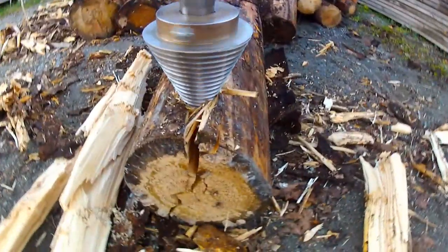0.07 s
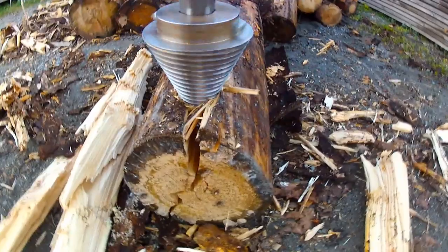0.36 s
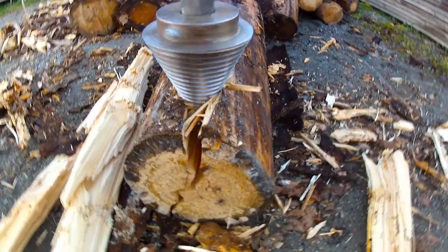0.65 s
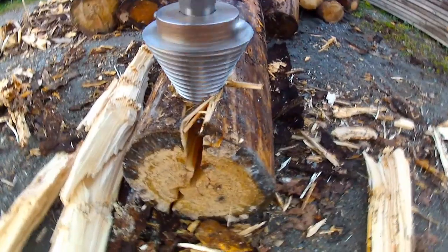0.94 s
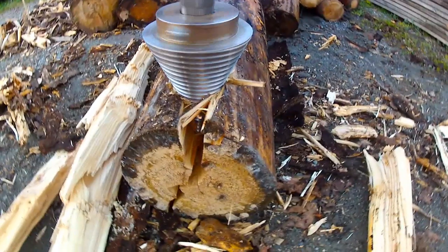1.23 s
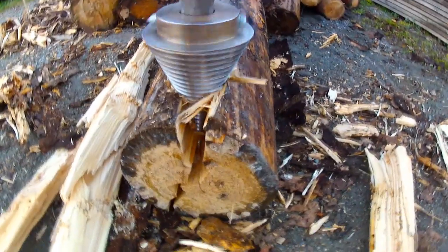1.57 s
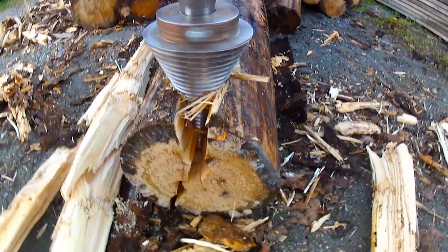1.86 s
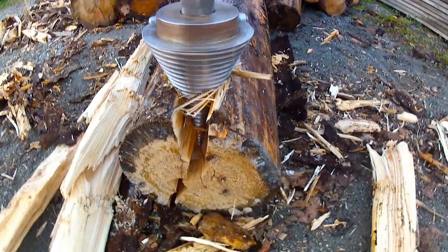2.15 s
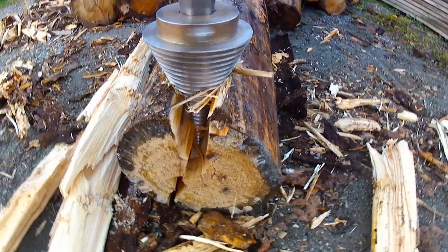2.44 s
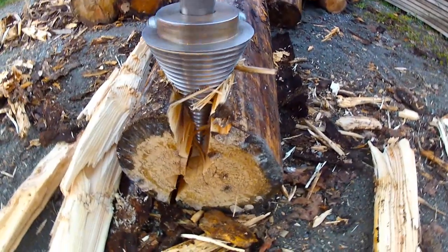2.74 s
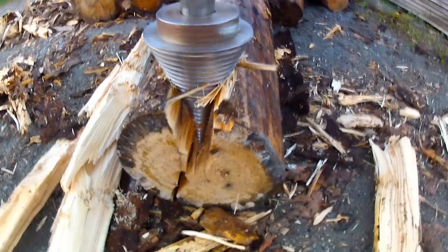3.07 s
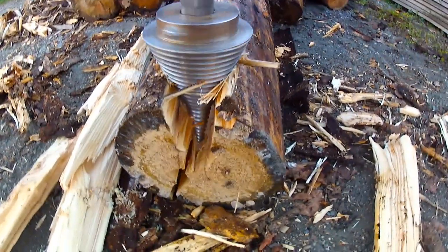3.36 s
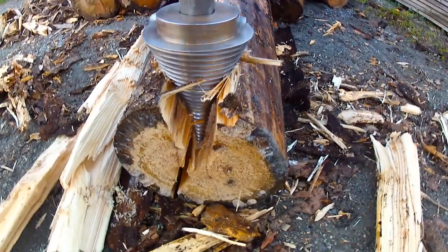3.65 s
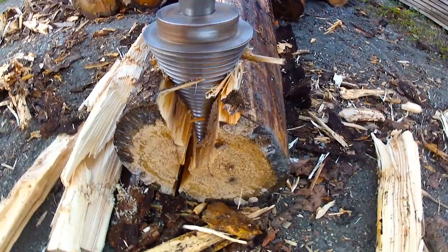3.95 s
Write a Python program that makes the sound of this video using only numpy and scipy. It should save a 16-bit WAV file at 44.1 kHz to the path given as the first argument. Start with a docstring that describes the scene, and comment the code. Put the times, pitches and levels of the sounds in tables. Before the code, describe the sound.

A log splits with sharp snaps and crackling while an engine hums steadily close by.

```python
"""Outdoors by a log pile, the camera's microphone close to a running engine.
The engine drives a cone screw that forces a log apart. Fibres crackle and splinters snap under the
strain; the big cracks also thump the log, and the ground and the pile scatter the sound back.
The camera adds a thin whine; its gain control ducks the engine after big cracks and lets it swell back."""
import sys
import numpy as np
from scipy import signal
from scipy.fft import rfft, irfft
from scipy.io import wavfile
from scipy.ndimage import uniform_filter1d, minimum_filter1d

SR = 44100
rng = np.random.default_rng(int(sys.argv[2]) if len(sys.argv) > 2 else 0)


def dump(signal):
    """Clip the signal to [-1, 1] and save it as 16-bit WAV at the path in sys.argv[1]."""
    limited = np.clip(np.atleast_2d(signal).T, -1, 1)
    pcm = np.round(limited * 32767).astype(np.int16)
    wavfile.write(sys.argv[1], SR, pcm)


N = 4 * SR


def amp(db):
    """Decibels to gain."""
    return 10 ** (np.asarray(db) / 20)


def unit(x):
    """Scales to rms 1."""
    return x / np.sqrt(np.mean(x ** 2) + 1e-20)


def curve(points):
    """A control curve at every sample."""
    return np.interp(np.arange(N) / SR, *np.transpose(points))


def spectrum_at(points, hz):
    """Interpolates on a log-frequency axis."""
    freq_hz, value = np.transpose(points)
    return np.interp(np.log(hz + 1), np.log(freq_hz + 1), value)


def add(mix, start_s, sound):
    """Mixes a sound in at a time."""
    part = mix[max(round(start_s * SR), 0):][:len(sound)]
    part += sound[:len(part)]


def band(x, hz, kind, order=2):
    """Butterworth filter."""
    return signal.sosfilt(signal.butter(order, hz, kind, fs=SR, output="sos"), x)


def drift(hz):
    """Random wander slower than about hz, rms 1."""
    rolloff = 1 + (np.fft.rfftfreq(N, 1 / SR) / hz) ** 4
    return unit(irfft(rfft(rng.standard_normal(N)) / rolloff, N))


def coloured(x, points):
    """Minimum-phase filter of unit energy with the given spectral shape."""
    log_gain = np.log(amp(spectrum_at(points, abs(np.fft.fftfreq(4096, 1 / SR)))))
    taps = np.fft.ifft(np.exp(np.conj(signal.hilbert(log_gain)))).real[:2048]
    return signal.oaconvolve(x, taps / np.linalg.norm(taps))[:N]


# The engine's deep drone: time_s, level_db
DRONE_LEVEL = [(0, -40), (.3, -48), (1.5, -42), (2.1, -47), (2.55, -36), (2.8, -39), (3.05, -29),
               (3.6, -31), (4, -30)]
def drone(pitch_hz=55.2):
    """A low tone that wavers in level and pitch."""
    gain = amp(curve(DRONE_LEVEL) + 2 * drift(11))
    phase = 2 * np.pi * np.cumsum(pitch_hz * (1 + 0.015 * drift(6))) / SR
    return gain * np.sin(phase)


# Colour of the machinery from close by: freq_hz, relative_db
CLATTER_COLOUR = [(20, -28), (45, -41), (90, -4), (150, -12), (205, 2), (270, 2.5), (350, -6), (430, 1.5),
                  (600, -6.5), (900, -5), (1250, -10.5), (1900, -12.5), (3000, -18), (5500, -23.5),
                  (10000, -29.5), (13000, -42), (16000, -43)]
def clatter(hum_phase, flicker_db=1.26):
    """Mechanical noise pulses with each firing."""
    bins = signal.stft(rng.standard_normal(N), nperseg=512)[2]
    patches = uniform_filter1d(rng.standard_normal(bins.shape), size=6, axis=0)
    patches = unit(uniform_filter1d(patches, size=8, axis=1))
    hiss = signal.istft(bins * amp(flicker_db * patches), nperseg=512)[1][:N]
    pulse = 1 + 0.21 * np.cos(hum_phase / 2) + 0.067 * np.cos(hum_phase)
    return unit(coloured(hiss * pulse, CLATTER_COLOUR))


# The engine's harmonics and a separate hum near 246 Hz: hum_multiple, level_db, unsteadiness
MACHINE_TONES = [(1, -19.5, 0.085), (1.5, -25.5, 0.11), (2, -33.5, 0.53), (2.105, -25, 0.25),
                 (2.5, -33, 0.48), (2.999, -42, 0.65), (3.5, -32.5, 0.77), (4, -45.5, 0.64)]
def machine_tones(hum_phase):
    """Tones follow the engine's speed, each wavering in level and phase."""
    tones = np.zeros(N)
    for multiple, level_db, shake in MACHINE_TONES:
        phase = multiple * hum_phase + multiple ** 2  # the offset staggers the peaks
        wavering = (1 + shake * drift(9.6)) * np.cos(phase)
        flutter = shake * drift(42) * np.sin(phase)
        tones += amp(level_db) * (wavering + flutter)
    return tones


# The engine's main hum, twice the firing rate: time_s, hum_hz
ENGINE_HUM = [(0.0, 118.6), (0.09, 116.5), (3.04, 115.5), (3.39, 118.4), (3.89, 118), (4.0, 118)]
# Engine load, as heard in the machine's tones: time_s, gain_db
ENGINE_LOAD = [(0, -3), (.55, -0.5), (.9, 4), (1.5, 1.5), (2, -3), (2.55, -0.5), (3.05, 1), (3.4, 1),
               (3.75, 2.5), (4, 1)]
def engine():
    """The engine runs close by; under load its clatter swells more than its tones."""
    hum_phase = 2 * np.pi * np.cumsum(curve(ENGINE_HUM) * (1 + 0.004 * drift(10.3))) / SR
    load_db = curve(ENGINE_LOAD)
    tones = machine_tones(hum_phase) * amp(load_db) + drone()
    return np.sqrt(2) * tones + clatter(hum_phase) * amp(-22 + 1.55 * load_db)


SPLINTER_LOW_CUT_HZ = 1060  # small splinters have no bass

# Fine crackle from the straining log: time_s, level_db
CRACKLE_LEVEL = [(0, -30), (.3, -38.5), (.47, -34.5), (.52, -42), (.74, -20), (.85, -24.5), (1.05, -65),
                 (1.22, -30), (1.32, -41), (1.65, -31), (2.15, -35.5), (2.235, -21), (2.29, -28),
                 (2.62, -34.5), (2.9, -30.5), (3.3, -31.5), (3.55, -74), (3.77, -52), (4, -37)]
def crackle(base_rate_hz=480, spread_db=4.5, decay_s=0.0019):
    """Single fibres break in clumps, most of them tiny."""
    chance, size, noise = rng.random(N), rng.exponential(1, N), rng.standard_normal(N)
    breaking = chance < base_rate_hz / SR * amp(3 * drift(40))
    breaks = breaking * amp(spread_db * np.minimum(size, 3))
    tearing = signal.lfilter([1], [1, -np.exp(-1 / (decay_s * SR))], breaks)
    return band(unit(tearing * noise), SPLINTER_LOW_CUT_HZ, "high", order=1) * amp(curve(CRACKLE_LEVEL))


def fracture(level_db, length_s, treble_db, grain_db=3.5):
    """One fibre fails sharply, and its neighbours give way in an avalanche of a few milliseconds."""
    t = np.arange(4096) / SR
    noise, size = rng.standard_normal((2, len(t)))
    avalanche = noise * amp(grain_db * size) * np.exp(-(t / length_s) ** 2)
    first_fibre = amp(-6) * (t == 0)
    burst = avalanche / np.linalg.norm(avalanche) + first_fibre
    burst *= np.sqrt(length_s * SR / np.sum(burst ** 2))
    treble = band(burst, 6000, "high", order=1)
    return amp(level_db) * (burst + (amp(treble_db) - 1) * treble)


def ringing(burst, pitch_hz, ring_db, width_hz=394):
    """A loosened splinter adds a brief ring to its burst."""
    radius = np.exp(-np.pi * width_hz / SR)
    pole = radius * np.exp(2j * np.pi * pitch_hz / SR)
    ring = 2 * signal.lfilter([1 - radius], [1, -pole], burst).real
    return 0.82 * burst + amp(ring_db) * ring


# Splinters snapping at the log: start_s, level_db, length_s, treble_db
SPLINTER_SNAPS = [(0.0646, -17, 0.0033, -2.5), (.159, -32, 0.0071, 12), (.1895, -18, 0.0066, -7),
                  (0.197, -23, 0.0053, -13), (0.238, -9, 0.0042, -6), (0.2743, -12.5, 0.0022, -6),
                  (0.35, -24, 0.0038, 8), (0.4026, -30.5, 0.0029, 14.5), (0.514, -19, 0.0033, 7),
                  (0.521, -13.5, 0.0057, -8), (0.539, -14, 0.0037, -15), (0.6274, -10, 0.003, -20),
                  (0.6412, -7.5, 0.0039, -4), (0.682, -2, 0.0019, -4), (0.6945, -2, 0.0032, -16),
                  (0.714, -12, 0.0076, -1), (0.72, -4.5, 0.0044, -13), (0.765, -9.5, 0.0089, -14),
                  (0.852, -16, 0.0024, -3), (0.9103, -6, 0.0071, -4), (1.03, -9, 0.0054, 5.5),
                  (1.0722, -9, 0.0045, -3), (1.285, -20, 0.0056, 8), (1.293, -10, 0.0086, -19),
                  (1.3346, -7, 0.0027, -11), (1.349, -12, .003, -9), (1.4017, -7, 0.0052, -31),
                  (1.462, -11, 0.0027, -23), (1.529, -18, 0.0039, -4), (1.551, -15.5, 0.0076, 0),
                  (1.762, -24.5, 0.0087, 7), (1.938, -17.5, 0.0015, 1.5), (2.07, -21, 0.0019, 9),
                  (2.236, -15, 0.0032, 10), (2.4319, -10.5, 0.0056, -16), (2.4486, -20, .003, -15.5),
                  (2.499, -17, 0.003, 5.5), (2.5455, -17.5, 0.0044, -1), (2.5696, -26.5, 0.0044, 15),
                  (2.5917, -15, 0.0095, -15), (2.6696, -21, 0.0079, -3), (2.7117, -8, 0.0032, 0.5),
                  (2.756, -15.5, 0.0027, 4.5), (2.768, -26, 0.0029, 13), (3.185, -11, 0.0042, -21),
                  (3.312, -23, .002, 10), (3.352, -31.5, 0.00067, 18), (3.6595, -22, 0.0058, 9.5),
                  (3.733, -15, 0.0023, 6.5), (3.7496, -20, 0.0084, 6), (3.7826, -7, 0.0035, -4),
                  (3.7995, -13.5, 0.0035, 4.5)]
def snaps(ring_hz=2780):
    """Small splinters break, and no two ring alike."""
    mix = np.zeros(N)
    for start_s, level_db, length_s, treble_db in SPLINTER_SNAPS:
        snap = band(fracture(level_db, length_s, treble_db), SPLINTER_LOW_CUT_HZ, "high", order=1)
        pitch_hz = ring_hz * np.exp(0.12 * rng.standard_normal())
        add(mix, start_s, ringing(snap, pitch_hz, ring_db=-1.5))
    return mix


# Modes of the log: pitch_multiple, relative_db, t60_s
LOG_MODES = [(1.002, 11, .032), (1.25, 0, 0.034), (1.6, -8.5, 0.049), (2.2, -20, 0.09), (3.3, -46, 0.012)]
def thump(level_db, pitch_hz, rumble_db, rise_s=0.0034, rumble_s=0.0044):
    """The log springs open: damped modes, a hollow blow and a short rough rumble."""
    t = np.arange(6000) / SR
    modes = np.zeros(len(t))
    for multiple, relative_db, t60_s in LOG_MODES:
        mode_hz = pitch_hz * multiple * (1 + 0.0061 * rng.standard_normal())
        modes += amp(relative_db - 60 * t / t60_s) * np.sin(2 * np.pi * mode_hz * t)
    push = rng.standard_normal(len(t)) * np.exp(-t / rumble_s)
    blow = amp(-3.5) * (t == 0)
    rumble = band(push / np.linalg.norm(push) + blow, [400, 990], "band")
    rumble *= np.sqrt(rumble_s * SR / np.sum(rumble ** 2))
    rise = 1 - np.exp(-(t / rise_s) ** 2)
    return 2 * rise * amp(level_db) * modes + amp(rumble_db) * rumble


# Cracks through the log: start_s, level_db, length_s, treble_db, ring_hz, thump_db, thump_hz, rumble_db
LOG_CRACKS = [(.1316, -9, 0.0053, -2.5, 3040, -17, 531, -17),
              (.502, -17.5, 0.0045, -2, 3030, -18, 412, -25),
              (0.5895, -7.5, 0.0042, -12, 3020, -15, 441, -43),
              (0.7265, 4, 0.0009, -14, 2620, -2.5, 457, 5), (0.9275, 0.5, .003, -4, 3260, -12.5, 400, -18),
              (0.9985, 2.5, 0.0032, -16, 2650, -4.5, 351, -13),
              (1.007, -15, 0.011, 7.5, 2580, -10, 296, -11), (1.155, 8, 0.0029, 0.5, 3140, 4.5, 386.5, 1),
              (1.5564, -1.5, 0.0051, -2.5, 3340, -4, 339, -8), (1.773, 0, 0.0029, -7, 2700, -7, 322, -6.5),
              (2.24, -9, 0.0029, 5.5, 2880, -19, 336, -20), (2.6902, -10.5, .007, 0.5, 2420, -12, 312, -9),
              (2.8985, -38, .003, -6, 1960, -5.5, 354, -30),
              (3.0673, -2, 0.002, 17.5, 2520, -0.5, 337, -2.5), (3.078, -7, 0.019, 4.5, 1480, 3.5, 330, 0),
              (3.9165, -9, 0.0044, 0.5, 3280, -14.5, 423, -20)]
def cracks():
    """Each crack tears fibres and thumps the log; returns the two layers apart."""
    tears, thumps = np.zeros((2, N))
    for start_s, level_db, length_s, treble_db, ring_hz, thump_db, thump_hz, rumble_db in LOG_CRACKS:
        add(tears, start_s, ringing(fracture(level_db, length_s, treble_db), ring_hz, ring_db=2.5))
        add(thumps, start_s, thump(thump_db, thump_hz, rumble_db))
    return tears, thumps


# Colour of breaking wood: freq_hz, relative_db
WOOD_COLOUR = [(150, -10), (400, 2.5), (800, 0.5), (1200, -4.5), (1700, 3.5), (2200, -2.5), (3000, 0),
               (4200, -2), (6500, -5), (10000, -9.5), (12300, -18.5), (13200, -19.5), (16000, -27)]
def log_splitting(travel_s_at_1khz=0.002003):
    """Crackle, cracks and snaps travel through the wood as bending waves, treble first."""
    fibres = crackle()
    tears, thumps = cracks()
    wood = coloured(fibres + tears + snaps(), WOOD_COLOUR) + thumps
    hz = np.fft.rfftfreq(2 * N, 1 / SR)
    slowness = np.sqrt(1000 / np.maximum(hz, 250))
    delay_s = travel_s_at_1khz * (slowness - slowness[len(hz) // 2])
    lag_cycles = np.cumsum(delay_s) * hz[1]
    return irfft(rfft(wood, 2 * N) * np.exp(-2j * np.pi * lag_cycles))[:N]


# Decay of the echoes off the ground and the log pile: freq_hz, t60_s
SCATTER_DECAY = [(200, 0.17), (1000, 0.12), (4000, 0.074), (14000, 0.059)]
def scatter(near_db=-7, far_db=-19.5, far_t60_s=0.24):
    """Impulse response: a short scatter from nearby wood and a faint longer tail."""
    t = np.arange(24000) / SR
    near, far = rng.standard_normal((2, len(t))) * (rng.random((2, len(t))) < .1)
    hz, frame_s, bins = signal.stft(near * np.minimum(t / 0.0088, 1) ** 2, SR, nperseg=128)
    decay = amp(-60 * frame_s / spectrum_at(SCATTER_DECAY, hz)[:, None])
    near = signal.istft(bins * decay, SR, nperseg=128)[1][:len(t)]
    near = band(near, 436, "high")  # the small pieces lying around reflect little bass
    far = band(far, 2300, "low", order=1) * np.minimum(t / 0.033, 1) * amp(-60 * t / far_t60_s)
    return amp(near_db) * near / np.linalg.norm(near) + amp(far_db) * far / np.linalg.norm(far)


def yard(direct, tails=7):
    """Short, diffuse echoes off the ground and log pile; random tails alternate so no pitch rings."""
    tail = np.arange(N) // 1500 % tails
    fades = (uniform_filter1d(1. * (tail == k), size=64) for k in range(tails))
    return direct + sum(signal.oaconvolve(direct * fade, scatter())[:N] for fade in fades)


def gain_control(x, threshold_db=-15.5, attack_s=0.015, quick_s=0.091, slow_s=0.44):
    """The camera turns down after a loud sound, then recovers in a quick and a slow part."""
    t = np.arange(N) / SR
    power = abs(uniform_filter1d(band(x, 470, "high", order=1) ** 2, size=176))
    log_excess = np.log(np.maximum(10 * np.log10(power + 1e-12) - threshold_db, 1e-6))
    # each peak over the threshold is caught and dies away exponentially
    quick, slow = (np.exp(np.maximum.accumulate(log_excess + t / s) - t / s) for s in (quick_s, slow_s))
    pole = np.exp(-1 / (attack_s * SR))
    duck_db = signal.lfilter([1 - pole], [1, -pole], 0.48 * quick + 0.52 * slow)
    return x * amp(-duck_db)


def limiter(x, ceiling=0.88):
    """The gain dips briefly around peaks above the ceiling."""
    gain = ceiling / np.maximum(abs(x), ceiling)
    return x * uniform_filter1d(minimum_filter1d(gain, size=25), size=25)


def scene():
    """At the microphone, in mono: the splitting log in front of the engine."""
    return (yard(log_splitting()) + engine())[None]


def record(dry):
    """The camera: thin electronic whine, gain control, peak limiter, band limit."""
    whine_hz, whine_db, edge_hz = 15661, -47.5, 16300
    whine = np.sqrt(2) * amp(whine_db) * np.sin(2 * np.pi * whine_hz * np.arange(N) / SR)
    levelled = limiter(gain_control(dry[0] + whine))
    lowpass = signal.firwin(255, edge_hz, window=("kaiser", 8), fs=SR)
    return signal.oaconvolve(levelled, lowpass, "same")[None]


dry = scene()
out = record(dry)
dump(out)
```